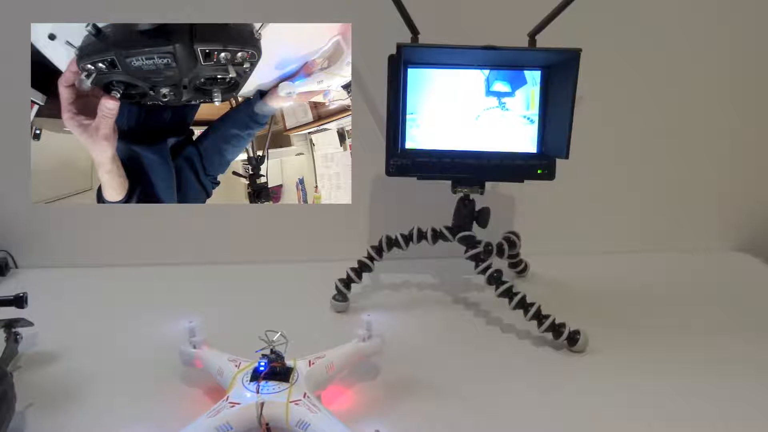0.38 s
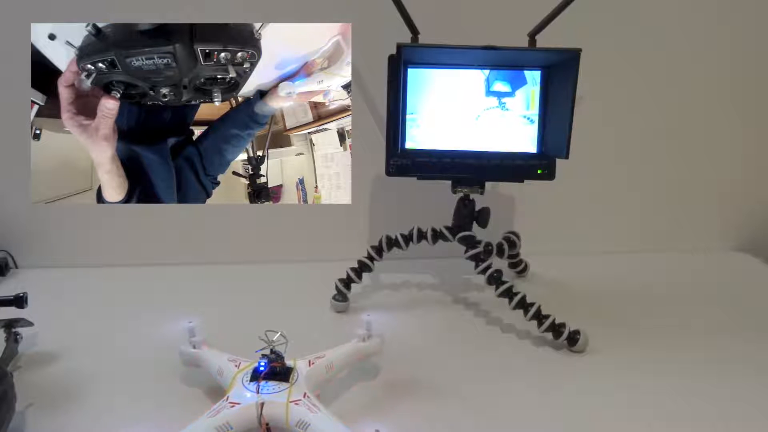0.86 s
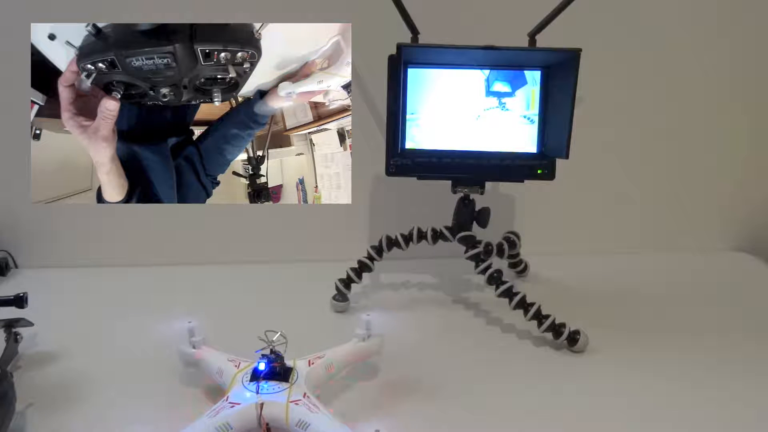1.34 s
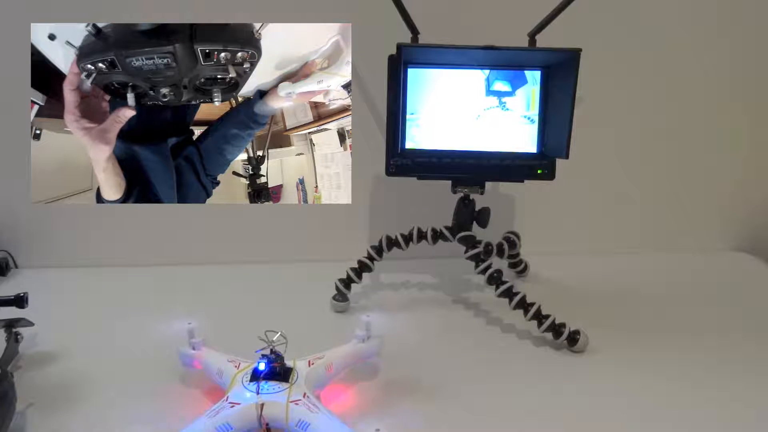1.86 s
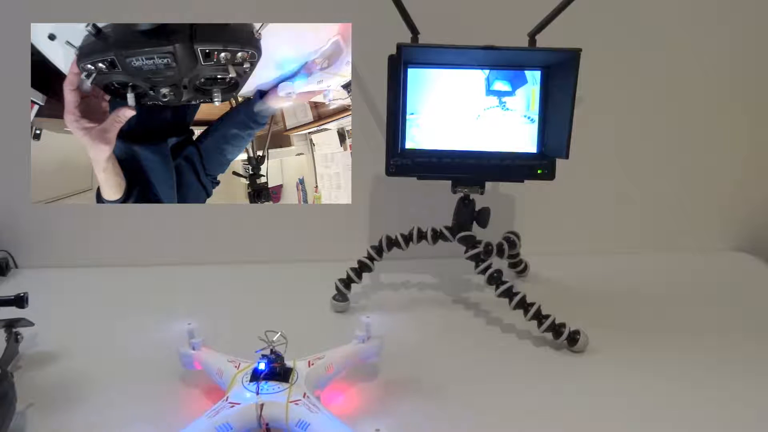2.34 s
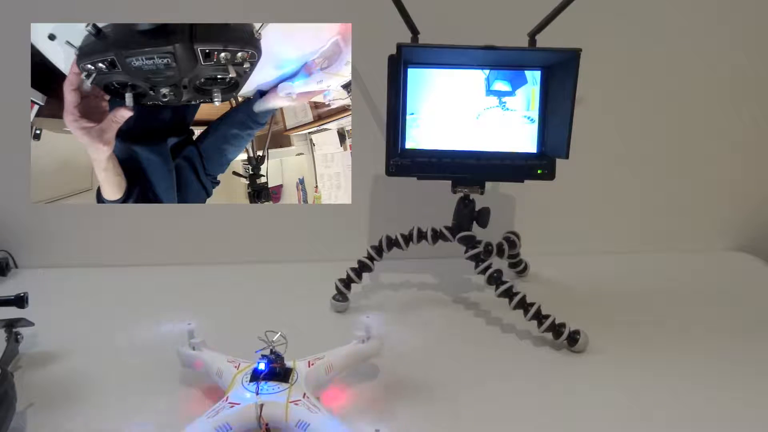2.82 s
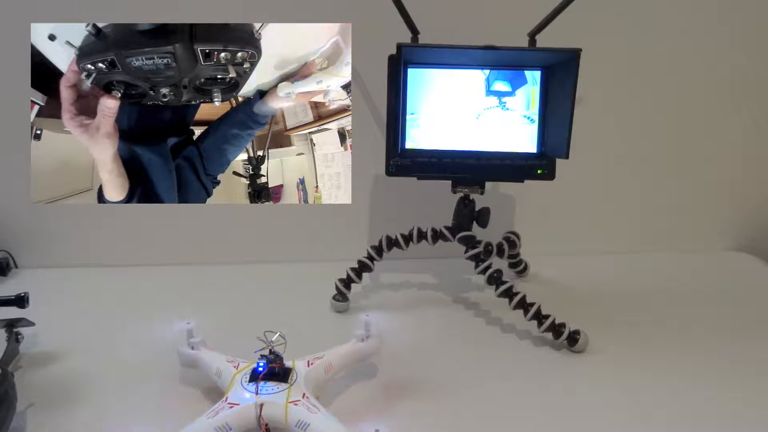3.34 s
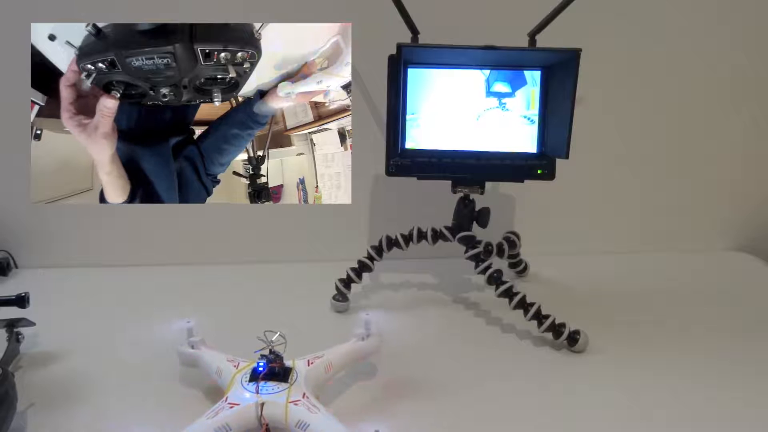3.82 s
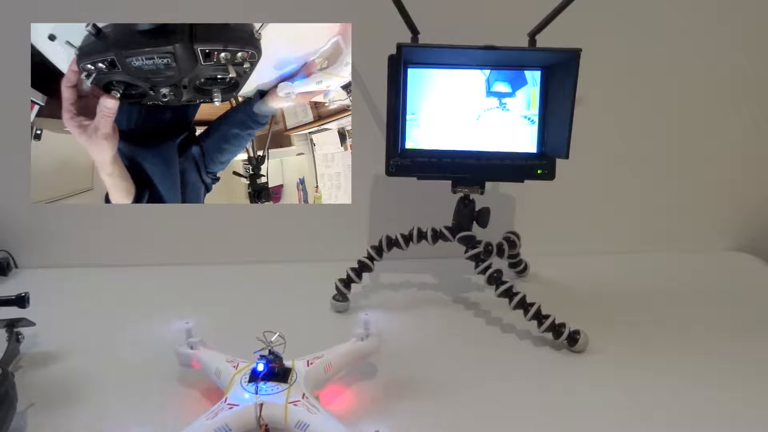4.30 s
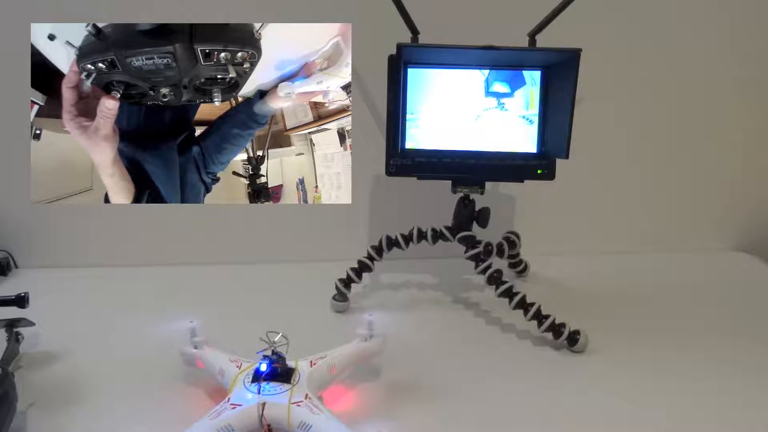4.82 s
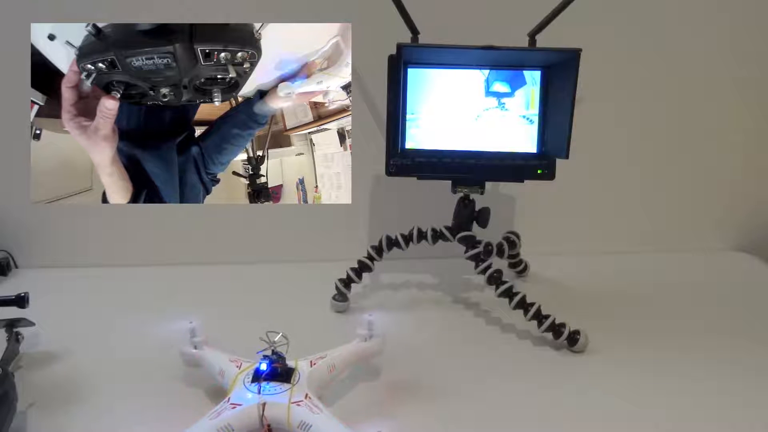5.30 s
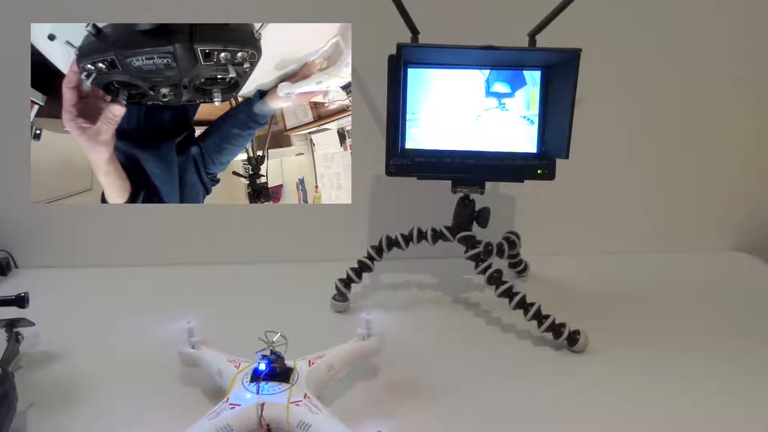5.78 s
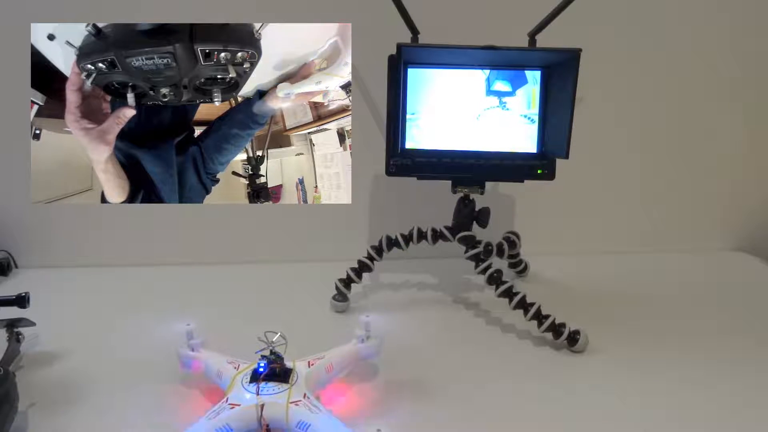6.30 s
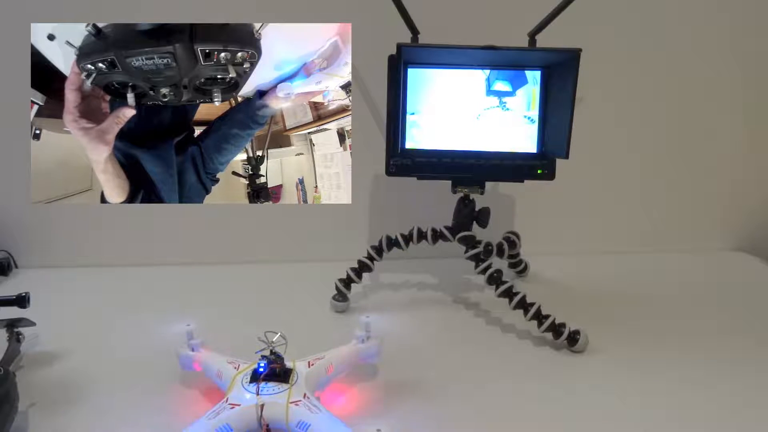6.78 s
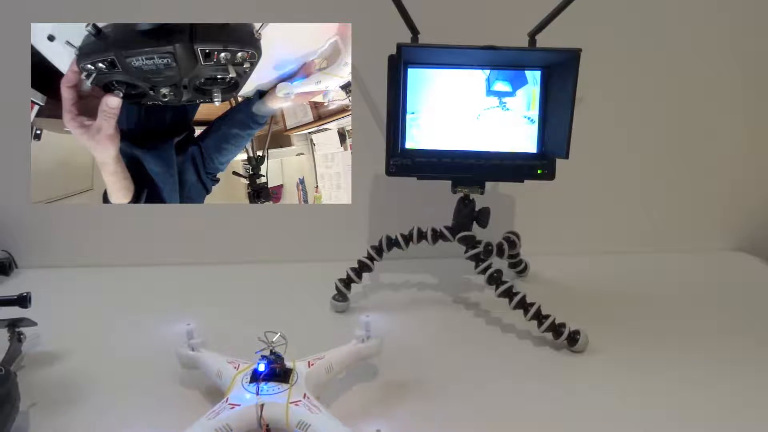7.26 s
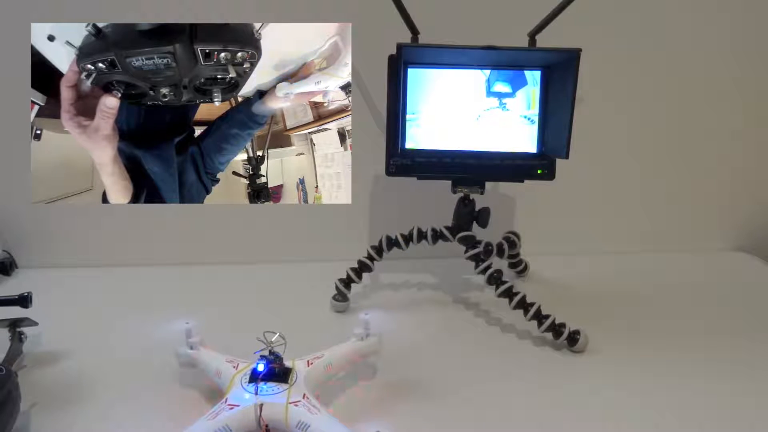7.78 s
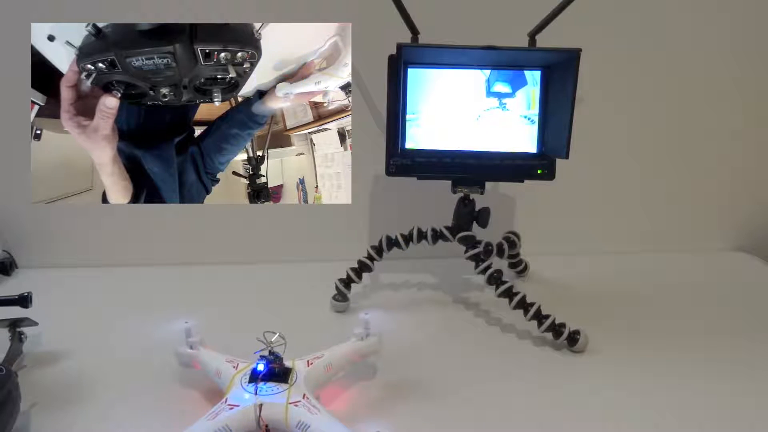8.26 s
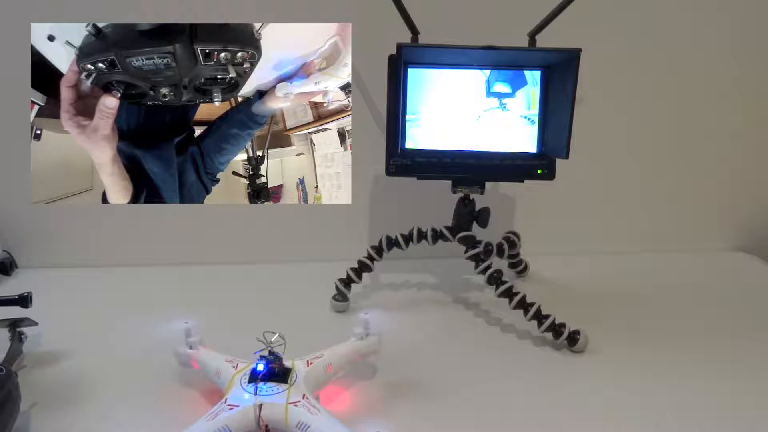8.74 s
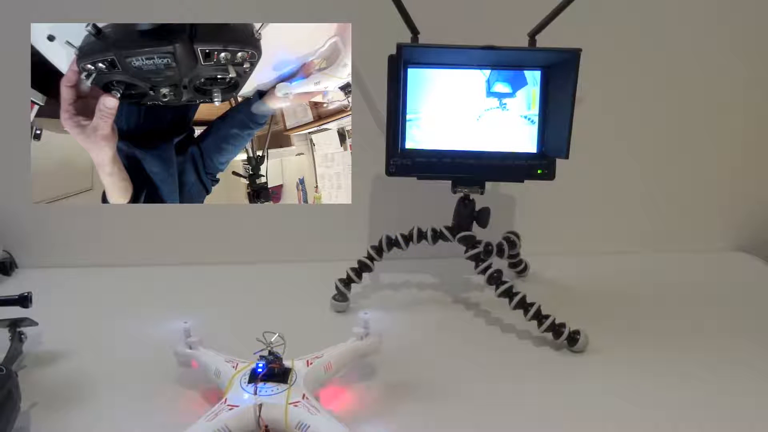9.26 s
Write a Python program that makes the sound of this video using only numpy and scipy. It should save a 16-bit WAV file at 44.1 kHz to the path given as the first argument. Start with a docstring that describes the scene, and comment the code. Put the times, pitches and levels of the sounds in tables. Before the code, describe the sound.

A toy quadcopter sits on a table in a small room, its four little geared motors screaming at full speed. They cut and coast down into slowing, rattling gear chatter, rev sharply back up for a longer steady run, coast down again, then climb quickly to a final, slightly louder run that holds to the end. Heard very close in stereo, bright and buzzy with little deep bass.

```python
"""Four small geared motors of a toy quadcopter run flat out on a table, coast down twice and spin up again.
Gear teeth tick into the plastic shell and whine at the meshing rate: one pulse a tooth, filtered by the shell.
Off-centre wheels throb and hum once a turn (sines at shaft multiples); brushes and bearings hiss (shaped noise).
A small room answers over a faint steady noise floor, heard by a close pair of microphones."""
import sys
import numpy as np
from scipy import signal
from scipy.io import wavfile
from scipy.ndimage import uniform_filter1d

SR = 44100
rng = np.random.default_rng(int(sys.argv[2]) if len(sys.argv) > 2 else 0)


def put_to_file(sound):
    """Save the sound as 16-bit audio at rate SR, in the file named by the first command-line argument."""
    columns = np.atleast_2d(sound).T  # one column per channel
    safe = np.clip(columns, -1, 1)
    whole_steps = np.round(safe * 32767)
    wavfile.write(sys.argv[1], SR, whole_steps.astype(np.int16))


def invert_db(x):
    """Field ratio 10**(x/20) for x, a level in decibels (scalar or array-like)."""
    u = np.asarray(x, float) / 20
    return 10 ** u


N = 413658  # length in samples

WHEEL_TEETH, PINION_TEETH = 53, 9
FULL_SPEED = 75  # shaft turns a second at pace 1


def evened(x):
    """Scales to rms 1 over both channels."""
    return x / np.sqrt(np.mean(x ** 2) + 1e-20)


def steadied(x):
    """Divides out the level over 0.2 s, shared by both channels, so that a level curve can set it."""
    power = abs(uniform_filter1d((x ** 2).mean(0), SR // 5))
    return x / np.sqrt(power + 1e-20)


def read(points, hz):
    """Reads a curve of (f/Hz, value) on a log-frequency axis."""
    f, value = np.transpose(points)
    return np.interp(np.log(hz + 1), np.log(f + 1), value)


def coloured(x, points, modes=()):
    """Minimum-phase filter: a spectrum (f/Hz, level/dB) lifted at modes (f/Hz, width/Hz, lift/dB)."""
    hz = abs(np.fft.fftfreq(8192, 1 / SR))
    db = read(points, hz) + sum(lift / (1 + (2 * (hz - f) / width) ** 2) for f, width, lift in modes)
    log_gain = np.log(invert_db(np.maximum(db, -100)))
    taps = np.fft.ifft(np.exp(np.conj(signal.hilbert(log_gain)))).real[:4096]
    return signal.oaconvolve(x, taps[None], axes=1)[:, :N]


def drift(hz):
    """Slow chance up to about hz: straight lines between normal random points."""
    step = SR / (2 * hz)
    count = int(N / step) + 2
    return np.interp(np.arange(N) / step, np.arange(count), rng.standard_normal(count))


def throttle():
    """Motor speeds, tooth load, throttle 0-1 and run level: soft start, quick climb, then air drag on the coast."""
    # pushes of the throttle, the first begun earlier: full on t/s, cut t/s, spin-up time t/s, level/dB
    runs = [(-3, 1.8, .2, 0), (3.019, 6.12, .225, 0), (7.124, 12, .145, 1)]
    # top shaft speed in each run, before the sag; one column a motor: f/Hz
    tops = [(76, 74.3, 72.5, 71.5), (76.6, 74.4, 73, 72.2), (78.3, 77, 68.4, 64.1)]
    # share of the top speed gained only slowly in each run; one column a motor: share/0-1
    lags = [(0, 0, 0, 0), (0, .35, .55, .7), (0, .25, .48, .47)]
    # time in which air drag halves the full speed; one entry a motor: t/s
    halving = [.27, .25, .22, .21]
    ease_s, ease_share, ease_db = .35, .045, 0.5  # just before a cut the speed sags and the level rises
    spin_shape, creep_s, step_s = 1.9, .25, .03  # shape of the climb, creep of the lagging share, falling in step
    cruise_load, settle_s, bite_s, let_go_s = .7, .4, .002, .05  # tooth load: 1 in the climb, then cruise

    t = np.arange(N) / SR
    speed, (load, on, run_db) = np.zeros((4, N)), np.zeros((3, N))
    for (start, cut, spin_s, db), top_hz, lag in zip(runs, tops, lags):
        since, after = np.maximum(np.minimum(t, cut) - start, 0), np.maximum(t - cut, 0)
        top_hz, lag, coast_s = (np.array(c)[:, None] for c in (top_hz, lag, halving))
        ease = np.exp(np.minimum(t - cut, 0) / ease_s)
        goal = top_hz * (1 - ease_share * ease)
        # the motors start from their leftover speeds and soon fall in step
        rest = speed[:, [max(int(start * SR), 0)]]
        rest = rest.mean() + (rest - rest.mean()) * np.exp(-since / step_s)
        climbed = goal + (rest - goal) * np.exp(-(since / spin_s) ** spin_shape)
        climbed = np.minimum(climbed, goal * (1 - lag * np.exp(-since / creep_s)))
        held = (1 - np.exp(-since / bite_s)) * np.exp(-after / let_go_s)
        pull = cruise_load + (1 - cruise_load) * np.exp(-(since / settle_s) ** 2)
        now = t >= start
        speed = np.where(now, climbed / (1 + after / coast_s), speed)
        load = np.where(now, held * pull, load)
        on = np.where(now, held, on)
        run_db = np.where(now, held * (db + ease_db * ease ** 4), run_db)
    return speed, load, on, run_db


def throb(turns, sharp):
    """An off-centre wheel binds once a turn."""
    return np.exp(sharp * (np.cos(2 * np.pi * turns) - 1))


def teeth_passed(turns, pace, load):
    """Teeth gone by; off-centre wheels and slack shift them, more so at speed and with free gears."""
    wobble = .15 * np.sin(2 * np.pi * turns) + .05 * np.sin(2 * np.pi * turns * WHEEL_TEETH / PINION_TEETH)
    play = .05 * drift(450) + .03 * drift(200) + .06 * drift(60)  # slack between the teeth blurs the whine
    shift = (wobble + play) * (.25 + .75 * pace + .45 * (1 - load) ** 2)
    return np.maximum.accumulate(turns * WHEEL_TEETH + shift)  # never backwards


def ticks(turns, speed, load, runout):
    """One tick a tooth, sized by drive, free knocking, wear and rattle, plus plain tones of the meshing."""
    octave, rub = 2.4, 1.7  # tones, times the tick's own partial
    pinion, pace = turns * WHEEL_TEETH / PINION_TEETH, speed / FULL_SPEED
    teeth = teeth_passed(turns, pace, load)
    k = np.arange(np.ceil(teeth[0]), teeth[-1]).astype(int)
    at = np.interp(k + .02 * rng.standard_normal(N)[k], teeth, np.arange(N))  # sample of each tick
    binding = throb(turns, sharp=3)
    unsteady = .5 * binding + .4 * np.sin(2 * np.pi * pinion) + .65 * drift(300) + .45 * drift(50)
    driven = 1.8 * load * (1 + unsteady)
    # free gears knock hard near a third of full speed and touch only where they bind
    chatter = .4 + 1.6 * pace ** 2 + 2.4 * np.exp(-((pace - .31) / .09) ** 2)
    coasting = .9 * runout * (1 - load) * chatter * binding

    # loaded teeth also sound as they part, an octave up; free teeth rub with a plain tone
    parting = octave * pace ** 5 * driven * np.cos(4 * np.pi * teeth)
    rubbing = rub * coasting * np.cos(2 * np.pi * teeth)
    tones = (parting + rubbing) * speed * WHEEL_TEETH / (2 * SR) / (1 + 1.3 * load)

    even, binding, load = (np.interp(at, np.arange(N), c) for c in (driven + coasting, binding, load))
    wear = 0.47 * rng.standard_normal(WHEEL_TEETH)[k % WHEEL_TEETH]  # the same at every turn
    wear = wear + 0.083 * rng.standard_normal(PINION_TEETH)[k % PINION_TEETH]
    burst_db = 2.98 * np.minimum(rng.exponential(1, N)[k], 3)
    rattle = 0.59 * rng.standard_normal(N)[k] * invert_db(burst_db)
    size = (even + (wear + rattle) * (1 + .25 * binding)) / (1 + 1.3 * load)  # load trades rattle for whine
    pulses = np.bincount((4 * at).astype(int), size, 4 * N)  # placed to a quarter sample
    return tones + signal.resample_poly(pulses, 1, 4)


def shell(gears):
    """The plastic shell rings to each tick."""
    # answer to one tick: f/Hz, level/dB per Hz
    answer = [(180, -50), (300, -17.5), (580, -21), (860, -4.5), (1050, -2.5), (1300, -3), (1700, -3),
              (1850, -8), (2150, -3.5), (2600, -3), (3400, -2.5), (4000, -7.5), (4900, -21), (6400, -24),
              (11000, -20), (14000, -57)]
    # resonances of the shell: f/Hz, width/Hz, lift/dB
    shell_modes = [(1290, 130, 4), (1660, 110, 3), (2000, 250, -3), (2610, 150, 6), (3250, 300, 2),
                   (4500, 250, 1)]
    return steadied(coloured(gears, answer, shell_modes))


def brush_noise(turns):
    """Brushes and bearings hiss: noise that swells once a turn and wavers slowly."""
    return (3.7 + throb(turns, sharp=2.2)) * invert_db(1.5 * drift(40)) * rng.standard_normal(N)


def hiss(brushes, gears, load):
    """Brush noise and, under load, the bright edge of the ticks, in one spectrum."""
    # spectrum of the hiss: f/Hz, level/dB per Hz
    spectrum = [(700, -41.5), (1200, -2.5), (2000, 3.5), (3000, -10), (4400, 10), (5200, -0.5), (6400, 5.5),
                (7000, 1.5), (8300, -1.5), (9100, 0.5), (10500, 4), (12000, -11.5)]
    edge = steadied(signal.lfilter([1, -2, 1], 1, gears))
    bright = steadied(brushes) + invert_db(9) * load * edge  # dB over the brush noise at full load
    return steadied(coloured(bright, spectrum))


def hum(turns):
    """Low multiples of the shaft speed and the spinning pinion shake the table."""
    # partials of the hum: multiple of the shaft speed, level/dB
    orders = [(1, -19), (2, -12.5), (3, -8.5), (4, -2.5), (5, -1), (6, -1), (7, 0.5), (8, -1.5)] + [(WHEEL_TEETH / PINION_TEETH, -0.5)]  # the pinion
    return sum(invert_db(db + 4 * drift(6)) * np.sin(2 * np.pi * (k * turns + rng.random())) for k, db in orders)


def table_top(shake):
    """Hum and a noisy rumble pass through the resonances of the table."""
    # spectrum of the rumble: f/Hz, level/dB per Hz
    low_noise = [(20, -58), (50, -37), (110, -17.5), (190, -14), (300, -9), (450, -10), (700, 4),
                 (1000, 0.5), (1500, -48.5)]
    # resonances of the table: f/Hz, width/Hz, lift/dB
    table_modes = [(242.4, 23, 10.5), (437, 44, 4), (543, 14, 6), (807, 26, 4.5)]
    middle, side = rng.standard_normal((2, N))
    noise = middle + 0.3 * side * [[1], [-1]]
    shake = evened(shake) + invert_db(3) * evened(coloured(noise, low_noise))  # rumble dB over the hum
    return evened(coloured(shake, [(1, 0), (SR, 0)], table_modes))


def room(x):
    """Sparse taps of random sign, each band dying at its own speed."""
    # decay by 60 dB: f/Hz, t/s
    decay = [(200, 0.89), (1000, 0.56), (4000, 0.06), (10000, 0.26)]
    taps = np.zeros((2, SR // 2))
    at = np.arange(100, SR // 2 - 20, 20) + rng.integers(0, 20, (2, (SR // 2 - 101) // 20))
    np.put_along_axis(taps, at, rng.choice([-1., 1.], at.shape), 1)
    taps[1] = taps[0] + 0.45 * taps[1]  # close microphones share much of the tail
    hz, t, z = signal.stft(taps, SR, nperseg=256)
    fade = invert_db(-60 * t / read(decay, hz)[:, None])
    tail = signal.istft(z * fade, SR, nperseg=256)[1]
    tail = tail / np.linalg.norm(tail, axis=1)[:, None]
    return signal.oaconvolve(x.mean(0)[None], tail, axes=1)[:, :N]


def noise_floor():
    """Steady noise behind everything, separate in the two channels."""
    # spectrum of the floor: f/Hz, level/dB per Hz
    spectrum = [(24, -83), (40, -65), (262, 3), (687, -4), (1300, 0), (2560, -15), (5070, -33),
                (11000, -22), (14300, -48), (22000, -120)]
    return evened(coloured(rng.standard_normal((2, N)), spectrum))


def scene():
    """Four motors on the table, their shell, the room and the noise floor."""
    # the four motors: level/dB, left-right/dB, hum level/dB, wheel run-out/1
    quartet = [(-3.5, 5.5, 3.5, 0.37), (-3.5, -0.5, -1.5, 0.46), (-3, 2.5, 0.5, 0.52), (-2.5, 3, 1, 0.94)]
    # ticks, hiss, hum: level at full speed/dB, power of speed, gain while pulling from rest/dB
    layers = [(-27, 1.663, 13), (-27.5, 2.45, 9.5), (-40.5, 2.17, -8)]
    room_db, floor_db, knock_db = -9, -71, 3.5

    speeds, load, on, run_db = throttle()
    pace = speeds.mean(0) / FULL_SPEED
    tick_db, hiss_db, hum_db = (db + run_db + 20 * power * np.log10(pace) + pull_db * on * (1 - pace ** 2)
                                for db, power, pull_db in layers)
    # free gears are louder near a third of full speed
    tick_db = tick_db + knock_db * (1 - on) * np.exp(-((pace - .33) / 0.087) ** 2)

    gears, brushes, shake = np.zeros((3, 2, N))
    for speed, (db, pan_db, shake_db, runout) in zip(speeds, quartet):
        # speed wavers, most in a loaded climb
        speed = speed * (1 + .004 * drift(20) + .055 * load * np.maximum(.9 - pace ** 2, 0) * drift(60))
        turns = rng.random() + np.cumsum(speed) / SR
        sides = invert_db(db + np.array([[pan_db / 2], [-pan_db / 2]]))
        gears += sides * ticks(turns, speed, load, runout)
        brushes += sides * brush_noise(turns)
        shake += sides * invert_db(shake_db) * (speed / FULL_SPEED) ** 2 * hum(turns)  # unbalance: speed squared

    motors = invert_db(tick_db) * shell(gears)
    motors = motors + invert_db(hiss_db) * hiss(brushes, gears, load)
    motors = motors + invert_db(hum_db) * table_top(shake)
    return motors + invert_db(room_db) * room(motors) + invert_db(floor_db) * noise_floor()


def roll_off(x):
    """The treble ends steeply here."""
    return signal.sosfilt(signal.butter(12, 12290, fs=SR, output="sos"), x)


def record(dry):
    """A close pair of slightly unequal microphones, with no deep bass and no top treble."""
    # balance of the pair: f/Hz, left-right/dB
    balance = [(300, -1.8), (700, 0), (2500, -2.5), (7000, -2.5), (11000, -4.5)]
    left = coloured(dry[:1], [(f, db / 2) for f, db in balance])
    right = coloured(dry[1:], [(f, -db / 2) for f, db in balance])
    x = np.vstack([left, right])
    x = signal.sosfilt(signal.butter(2, 60, "high", fs=SR, output="sos"), x)  # Hz
    low_pass = signal.firwin(511, 11060, window=("kaiser", 9), fs=SR)  # taps, Hz
    x = signal.oaconvolve(x, low_pass[None], "same")
    return roll_off(x)


dry = scene()
out = record(dry)
put_to_file(out)
```